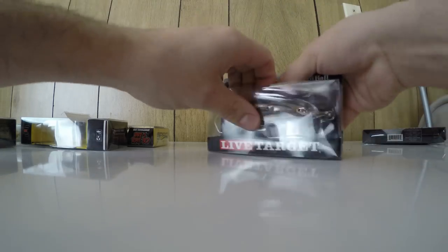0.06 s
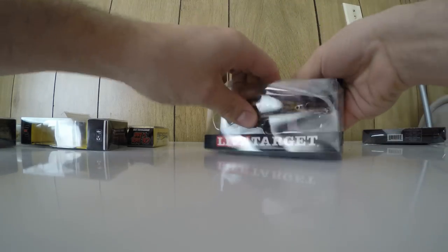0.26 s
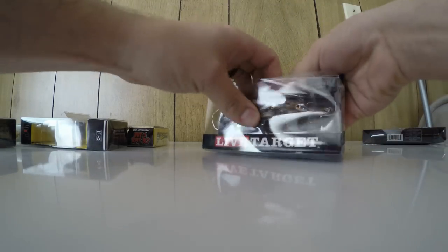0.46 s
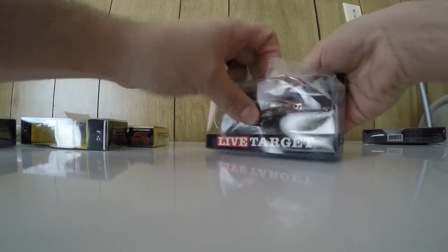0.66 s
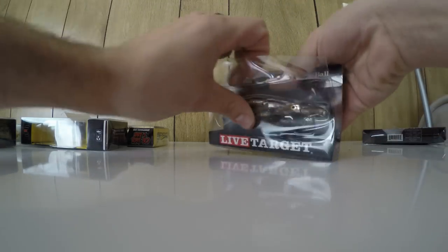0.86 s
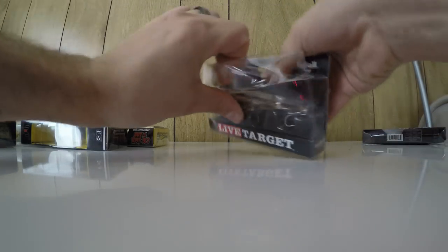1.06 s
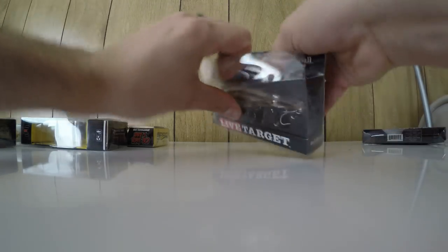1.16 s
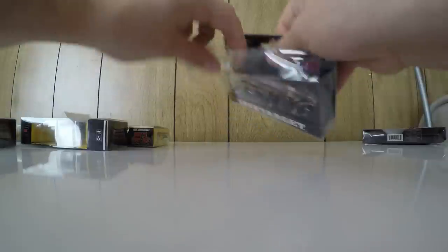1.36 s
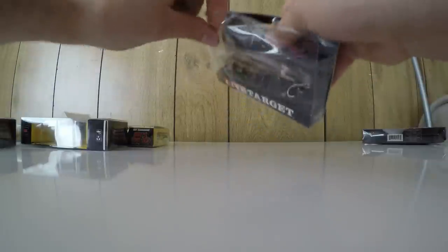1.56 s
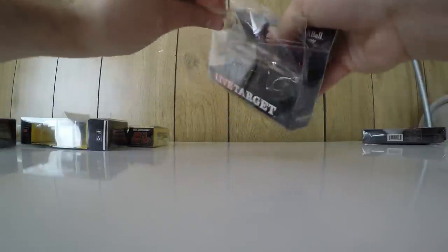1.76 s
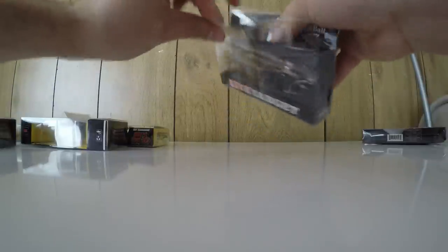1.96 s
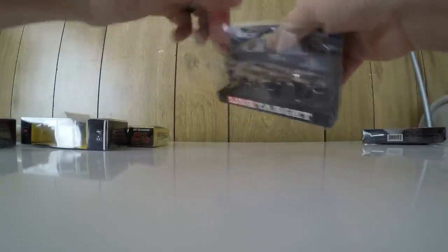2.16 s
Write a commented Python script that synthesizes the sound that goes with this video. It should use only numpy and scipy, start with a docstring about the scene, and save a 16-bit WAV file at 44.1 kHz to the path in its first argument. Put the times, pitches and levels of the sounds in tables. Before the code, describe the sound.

Thin plastic packaging snaps and crinkles as hands work a tray out of a cardboard box. Clusters of sharp pops alternate with soft rubbing and ticks, and the box bumps the table twice. Close microphone, small room, low rumble.

```python
"""In a small panelled room, close above a table, hands work a clear plastic tray out of a cardboard box.
The thin plastic buckles in sharp snaps. Between them it sticks and slips along the card, making tiny
ticks and a soft rub. Fingers scuff the box, small creases give way, and the box bumps the table twice.
A wall and the room echo over a low steady rumble, and the loudest snaps overload the microphone."""
import sys
import numpy as np
from scipy import signal
from scipy.fft import rfft, irfft, next_fast_len
from scipy.io import wavfile

SR = 44100
rng = np.random.default_rng(int(sys.argv[2]) if len(sys.argv) > 2 else 0)


def digitize_waveform(pressure):
    """Quantize a signal to 16-bit integers and store it at the path in sys.argv[1].

    Rows of a 2-D input are taken as channels; values are limited to [-1, 1].
    """
    field = np.atleast_2d(pressure).T
    bounded = np.clip(field, -1, 1)
    quanta = np.round(bounded * 32767).astype(np.int16)
    wavfile.write(sys.argv[1], SR, quanta)


N = 97020
T = np.arange(SR // 8) / SR  # the clock for one short sound, in seconds

# Levels in the tables are relative: the code scales them as it mixes.
# tone of the background rumble (frequency [Hz], level [dB])
RUMBLE_TONE = [(20, -7), (38, 0.5), (70, -11.5), (160, -20.5), (400, -18.5), (950, -29.5), (2000, -32.5),
               (6000, -38.5), (15000, -55)]
# how loudly the plastic slides on the card (time [s], slip level [dB], rub level [dB])
SLIDE_LEVELS = [(0, -43.5, -50), (.085, -41.5, -47), (0.123, -34.5, -39), (.2, -35.5, -38),
                (.3, -43.5, -42.5), (0.347, -35.5, -33), (0.411, -58, -37), (.49, -34.5, -44.5),
                (.59, -40, -34), (0.681, -44, -44.5), (.9, -46, -43.5), (.97, -47, -47.5),
                (1.062, -51, -58), (1.119, -42, -42), (1.17, -79, -53), (1.21, -38, -45), (1.33, -49, -42),
                (1.451, -42, -50), (1.509, -40, -31), (1.6, -40.5, -42), (1.72, -45.5, -32),
                (1.83, -49, -41.5), (1.889, -38.5, -40), (1.924, -26, -27), (1.96, -39.5, -34),
                (2.03, -46, -41.5), (2.068, -44, -38), (2.121, -45.5, -49), (2.2, -37.5, -48.5)]
# how often the tray slips (time [s], rate [slips per second])
SLIP_RATES = [(0, 85), (.28, 95.6), (.35, 273), (.45, 96), (.62, 66), (.92, 164), (1.08, 62), (1.125, 383),
              (1.2, 117), (1.45, 93), (1.52, 181), (1.6, 86.4), (1.91, 260), (2.2, 86.6)]
# tone of the body of a slip (frequency [Hz], level [dB])
SLIP_TONE = [(150, -10), (450, -6), (700, 0), (1050, 7.5), (1600, -5.5), (3200, -11.5), (5000, -20),
             (15000, -38)]
# tone of the crisp edge of slips and ticks (frequency [Hz], level [dB])
EDGE_TONE = [(500, -6), (2000, 9), (4000, 10), (7000, 2), (10500, -3.5), (15000, -17.5)]
# tone of the soft rub (frequency [Hz], level [dB])
RUB_TONE = [(30, -21), (120, -19), (450, -4.5), (700, 5), (1000, 3), (1600, 2), (3000, -4), (6000, -16.5),
            (10000, -26), (15000, -39)]
# how long the room's echo lasts (frequency [Hz], fade time [s])
ROOM_FADES = [(100, 0.26), (700, 0.25), (2000, 0.17), (5000, 0.19), (14000, 0.23)]
# tone of the room's echo (frequency [Hz], level [dB])
ROOM_TONE = [(80, -4.5), (400, -21.5), (800, -14.5), (1600, -17), (4500, -9), (8000, -15), (14000, -11)]
# standing waves, the notes the room holds on to (pitch [Hz], peak gain [dB], fade time [s])
ROOM_NOTES = [(666, -5, 0.18), (955, -15, 1)]
# buckles of the tray (time [s], panel pitch [Hz], panel level [dB], pop pitch [Hz],
# shell level [dB], crack level [dB], thump level [dB])
BUCKLES = [(0.0426, 725, -38.5, 1650, -36, -51, -33.5), (0.2091, 970, -29.5, 1440, -48, -47, -32),
           (0.2172, 1325, -23.5, 1700, -19.5, -37, -36), (0.3735, 1370, -22, 1490, -27, -30.5, -33),
           (0.4283, 730, -26.5, 1650, -27, -36.5, -25.5), (0.4421, 1045, -27, 2650, -24, -34.5, -53),
           (0.4725, 850, -26.5, 2250, -25.5, -35, -32), (0.4837, 950, -26.5, 3100, -27, -38, -44),
           (0.4989, 1620, -42, 2090, -27, -39, -37), (0.5176, 680, -34, 1990, -31, -42, -43),
           (0.5275, 692, -16.5, 1970, -24.5, -39, -52), (0.536, 1473, -14, 1990, -12.5, -23, -46),
           (0.5432, 960, -20.5, 2100, -26, -38, -61), (0.5476, 1050, -29, 2340, -17.5, -19.5, -38),
           (0.5541, 667, -16.5, 1790, -19, -33, -26), (0.743, 1004, -10.5, 1670, -13.5, -27, -32),
           (0.76, 930, -20.5, 1930, -27, -33, -29), (0.7855, 1099, -9, 1617, -7.5, -14, -15),
           (0.7936, 670, -19.5, 1520, -37, -33, -36), (0.8088, 904, -15, 1560, -16.5, -32.5, -28),
           (1.1873, 1090, -24, 1640, -27.5, -28.5, -50), (1.2126, 1040, -31, 1450, -41, -42.5, -47),
           (1.238, 610, -30.5, 1710, -44, -46, -58), (1.2778, 1140, -35, 1520, -38, -69, -41),
           (1.3193, 1034, -30, 1420, -31.5, -40.5, -38), (1.3589, 899, -32.5, 1521, -41, -47, -55),
           (1.4745, 895, -27, 1600, -34, -41, -29), (1.4811, 953, -23.5, 2350, -21, -31.5, -36),
           (1.498, 1056, -26.5, 2030, -23.5, -32, -27.5), (1.513, 950, -22, 1880, -38, -34.5, -25),
           (1.6207, 924, -23, 1460, -22.5, -48, -35), (1.6263, 794, -17, 1600, -26.5, -36.5, -30.5),
           (1.6756, 938, -14.5, 1840, -17, -31.5, -21.5), (1.703, 954, -22, 1570, -27, -36.5, -23),
           (1.7377, 975, -30, 1620, -22.5, -45, -56), (1.7471, 1063, -12.5, 2020, -18.5, -18.5, -56),
           (1.7735, 820, -23.5, 2130, -23, -27.5, -58), (1.879, 1070, -36, 1470, -34, -46, -62),
           (1.9034, 1123, -22.5, 1868, -23.5, -34.5, -21), (1.9099, 1647, -38, 1870, -21, -24, -46),
           (1.9206, 670, -17, 1460, -17, -24, -46), (1.9269, 958, -15, 1780, -16, -28.5, -48),
           (2.0597, 856, -33.5, 1623, -35.5, -43.5, -36)]
# ringing notes of the box's air and card (pitch [Hz], level [dB], fade time [s])
BOX_NOTES = [(684.5, -6.5, 0.027), (860, -11.5, 0.042), (1027, 2.5, 0.013), (1038, -8.5, 0.04)]
# ringing notes of the plastic shell (pitch [Hz], level [dB], fade time [s])
SHELL_NOTES = [(1360, -6.5, 0.016), (1378, 0, 0.02), (1620, -1, 0.016), (1787, -5.5, 0.032),
               (2395, -0.5, 0.016), (3140, -1, 0.02), (3596, -15, 0.033), (3770, 2.5, 0.018)]
# tone of the crack at a crease (frequency [Hz], level [dB])
CRACK_TONE = [(300, -21), (1500, 0), (3000, 4), (4500, 2.5), (6000, 0.5), (8000, -4), (11000, -11),
              (15000, -16)]
# tone of the box's thump into the hands (frequency [Hz], level [dB])
THUMP_TONE = [(25, -7), (85, -6), (150, -3.5), (240, -3), (330, -7.5), (430, -6.5), (700, -7), (2000, -98)]
# fingers shifting their grip (middle time [s], half width of the swell [s], level [dB], pitch [Hz])
SCUFFS = [(0.162, 0.16, -36.5, 590), (0.197, 0.0037, -29, 460), (0.428, .008, -42, 271),
          (1.207, 0.013, -42.5, 173), (1.519, 0.0021, -37, 223), (1.617, 0.0083, -32, 165),
          (1.715, 0.007, -29, 224), (1.922, 0.0099, -23.5, 423)]
# small creases giving way (time [s], edge level [dB], body level [dB])
CREASES = [(0.109, -49, -45), (0.117, -49, -32), (0.1237, -51, -32.5), (0.128, -49, -39),
           (0.1358, -41, -35), (0.147, -46.5, -41), (0.168, -48, -35), (0.178, -50, -41),
           (0.2385, -42, -36), (0.275, -42, -32.5), (0.287, -52, -34), (0.324, -35.5, -31.5),
           (0.342, -33, -38), (0.353, -43, -29.5), (0.357, -36, -29), (0.365, -42, -33), (0.407, -44, -39),
           (0.617, -42.5, -33), (0.644, -43, -40.5), (0.693, -61, -33.5), (0.961, -50, -41),
           (0.972, -61, -40), (0.985, -53, -47), (0.9997, -46, -38.5), (1.024, -48, -39.5),
           (1.0479, -43.5, -39), (1.086, -46.5, -34), (1.0995, -43.5, -40), (1.426, -47, -37.5),
           (1.551, -43, -43), (1.5818, -52, -29), (1.599, -45, -45), (1.711, -53, -31), (1.843, -45, -51),
           (1.862, -40.5, -35), (1.886, -46, -30), (1.891, -43, -33.5), (2.0877, -50, -30.5),
           (2.1599, -48, -36)]
# tone of the body of a tick (frequency [Hz], level [dB])
TICK_TONE = [(250, -17.5), (1000, 5), (1900, -0.5), (4000, -11), (9000, -32.5)]
# the box hitting the table (time [s], level [dB])
TABLE_HITS = [(0.549, -23.5), (0.7858, -21.5)]

SHARP_RISE_S, SOFT_RISE_S = 0.00015, 0.0015
WALL_DELAY_S, WALL_DB, ROOM_DELAY_S = 0.0091, -24, 0.005


def amp(db):
    """Turn decibels into a number to multiply by."""
    return 10 ** (np.asarray(db) / 20)


def unit(x):
    """Scale a sound to an average power of 1."""
    return x / np.sqrt(np.mean(x ** 2) + 1e-20)


def burst(x):
    """Scale a short sound to the energy of power 1 held for 10 ms."""
    return x / np.sqrt(np.sum(x ** 2) / (SR / 100) + 1e-20)


def along(points, hz):
    """Read between (frequency, value) points, with octaves evenly spaced."""
    freqs, values = np.transpose(points)
    return np.interp(np.log(hz + 1), np.log(freqs + 1), values)


def fade(seconds, t=T):
    """Die away by 60 dB in the given fade time."""
    return np.exp(-np.log(1000) * t / seconds)


def rise(seconds):
    """Swell smoothly from silence."""
    return 1 - np.exp(-T / seconds)


def sine(hz, t=T):
    """A pure note."""
    return np.sin(2 * np.pi * hz * t)


def colour(x, tone):
    """Filter a sound to follow a tone table."""
    size = 2 * next_fast_len(len(x))
    gain = amp(along(tone, np.fft.rfftfreq(size, 1 / SR)))
    cepstrum = irfft(np.log(gain), size)
    # fold the filter so that it rings only after a sound, never before
    cepstrum[1:size // 2] *= 2
    cepstrum[size // 2 + 1:] = 0
    return irfft(rfft(x, size) * np.exp(rfft(cepstrum)), size)[:len(x)]


def add(track, start_s, sound):
    """Mix a sound into the track at the given time."""
    part = track[max(0, round(start_s * SR)):][:len(sound)]
    part += sound[:len(part)]


def ring(notes, detune, scatter_db=3):
    """An object struck at a new spot: each note gets its own strength, sign and slight pitch shift."""
    hz, db, fade_s = np.transpose(notes)[:, :, None]
    shift, size, side = rng.standard_normal((3, len(notes), 1))
    strength = np.sign(side) * amp(db + scatter_db * size)
    return np.sum(strength * fade(fade_s) * sine(hz * (1 + detune * shift)), axis=0)


def rumble(level_db=-46.5):
    """A low, steady background noise."""
    return amp(level_db) * unit(colour(rng.standard_normal(N), RUMBLE_TONE))


def sliding(jitter=0.3, scatter_db=3, edge_db=-7):
    """The tray sticks and slips over a soft rub; the faster it slips, the crisper it sounds."""
    t = np.arange(N) / SR
    rate = np.interp(t, *np.transpose(SLIP_RATES))
    grit, rub_noise, fine_grit = rng.standard_normal((3, N))
    gaps, sizes = rng.standard_normal(size=(600, 2)).T
    # a slip comes each time the running count passes one of these unevenly spaced marks
    marks = np.cumsum(np.exp(jitter * gaps))
    starts = np.interp(marks, np.cumsum(rate) / SR, t, right=N / SR)
    slips = np.zeros(N)
    for start, db in zip(starts, scatter_db * np.clip(sizes, -2, 2)):
        add(slips, start, amp(db) * fade(0.007))
    body = unit(colour(slips * grit / np.sqrt(rate), SLIP_TONE))
    edge = amp(edge_db) * unit(colour(slips * fine_grit * rate ** 1.18, EDGE_TONE))
    rub = unit(colour(rub_noise, RUB_TONE))
    times, slip_db, rub_db = np.transpose(SLIDE_LEVELS)
    return amp(np.interp(t, times, slip_db)) * (body + edge) + amp(np.interp(t, times, rub_db)) * rub


def room(x):
    """The room answers a sound with a short blur of echoes and two ringing notes."""
    hz, frame_times, bands = signal.stft(rng.standard_normal(SR // 3), SR, nperseg=256)
    bands = bands * fade(along(ROOM_FADES, hz)[:, None], frame_times)
    tail = signal.istft(bands, SR, nperseg=256)[1]
    tail = colour(tail / np.linalg.norm(tail), ROOM_TONE)
    t = np.arange(len(tail)) / SR
    for note_hz, db, fade_s in ROOM_NOTES:
        decay = fade(fade_s, t)
        tail += 2 * amp(db) * sine(note_hz, t) * decay / np.sum(decay)
    return signal.fftconvolve(x, tail)


def snap(panel_hz, panel_db, pop_hz, shell_db, crack_db, thump_db):
    """A plastic panel flips: it swings and pops, box and shell ring, a crease cracks, the box thumps."""
    panel = burst(sine(panel_hz) * fade(0.027) * rise(SOFT_RISE_S))
    box = burst(ring(BOX_NOTES, detune=0.025) * rise(SOFT_RISE_S))
    pop = burst(sine(pop_hz) * fade(0.016) * rise(SHARP_RISE_S))
    # shell notes near the pop ring most: 0.63 octaves away they lose 6 dB
    near_pop = [(hz, db - 6 * (np.log2(hz / pop_hz) / 0.63) ** 2, fade_s)
                for hz, db, fade_s in SHELL_NOTES]
    shell = burst(ring(near_pop, detune=0.06) * rise(SHARP_RISE_S))
    # a big panel cracks duller, losing treble above 4940 Hz
    db_per_octave = 0.39 * np.clip(panel_db - crack_db, 0, 20)
    dulled = [(hz, db - db_per_octave * max(0, np.log2(hz / 4940))) for hz, db in CRACK_TONE]
    crack = burst(colour(rng.standard_normal(len(T)) * fade(0.012) * rise(SHARP_RISE_S), dulled))
    thump = burst(colour(rng.standard_normal(len(T)) * fade(0.032) * rise(0.0011), THUMP_TONE))
    return (amp(panel_db) * (amp(-3.5) * panel + amp(-4) * box)
            + amp(shell_db) * (amp(-6.5) * pop + amp(-0.5) * shell)
            + amp(crack_db + 2) * crack
            + amp(thump_db - 2) * thump)


def snaps():
    """Each snap arrives directly, its sideways sound bounces off a wall, and both fill the room."""
    out = np.zeros(N)
    for start, *buckle in BUCKLES:
        direct, sideways = snap(*buckle), snap(*buckle)
        add(out, start, direct)
        add(out, start + WALL_DELAY_S, amp(WALL_DB) * sideways)
        add(out, start + ROOM_DELAY_S, (room(direct) + room(sideways)) / np.sqrt(2))
    return out


def finger_scuffs():
    """Fingers shift on the box, each time making a short, dull swell of noise."""
    out = np.zeros(N)
    for middle, half_width, db, hz in SCUFFS:
        tone = [(hz / 4, -20), (hz, 0), (hz * 4, -32), (SR / 2, -70)]
        noise = unit(colour(rng.standard_normal(len(T)), tone))
        swell = np.exp(-0.5 * ((T - T.mean()) / half_width) ** 2)
        add(out, middle - T.mean(), amp(db) * noise * swell)
    return out


def crease_ticks():
    """A crease gives way without flipping a panel: a tiny burst with a crisp edge and a little body."""
    out = np.zeros(N)
    for start, edge_db, body_db in CREASES:
        edge, body = rng.standard_normal((2, len(T))) * fade(0.012) * rise(SHARP_RISE_S)
        add(out, start, amp(edge_db + 3.5) * burst(colour(edge, EDGE_TONE)))
        add(out, start, amp(body_db + 0.5) * burst(colour(body, TICK_TONE)))
    return out


def table_bumps():
    """The hardest tugs jolt the box against the table, which gives one low thud each time."""
    out = np.zeros(N)
    thud = burst(sine(hz=96) * fade(0.075) * rise(0.0012))
    for start, db in TABLE_HITS:
        add(out, start, amp(db) * thud)
    return out


def scene():
    """The package being opened in the room, over the rumble, in one channel."""
    background = rumble()
    handling = sliding() + crease_ticks() + finger_scuffs()
    out = background + handling + snaps() + table_bumps()
    add(out, ROOM_DELAY_S, room(handling))
    return out[None]


def record(dry, ceiling=0.97, top_hz=15200):
    """The microphone flattens the tallest peaks and cuts off the highest treble."""
    flattened = dry / (1 + np.abs(dry / ceiling) ** 6) ** (1 / 6)
    treble_cut = signal.butter(14, top_hz, fs=SR, output="sos")
    return signal.sosfiltfilt(treble_cut, flattened)


dry = scene()
out = record(dry)
digitize_waveform(out)
```